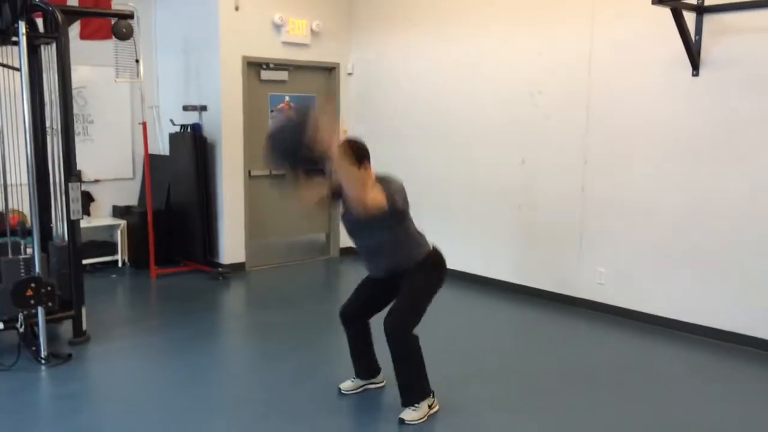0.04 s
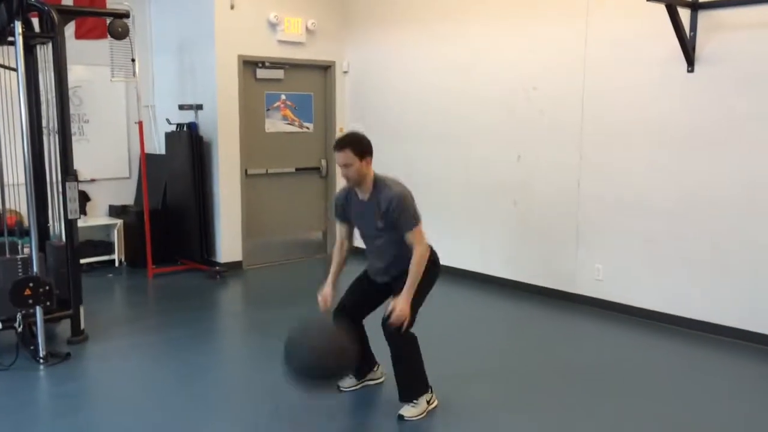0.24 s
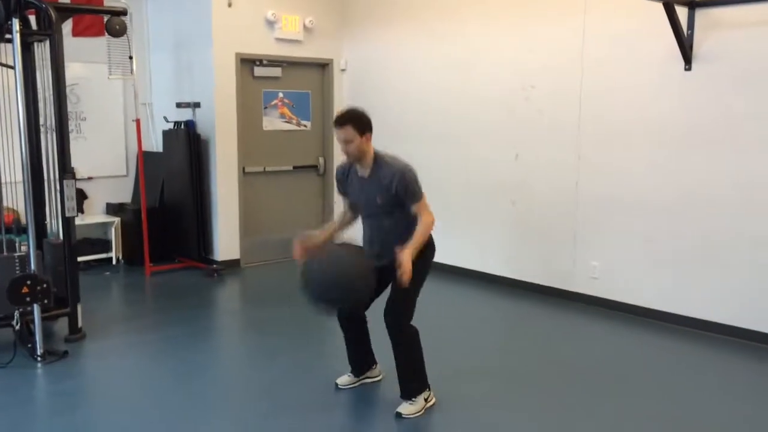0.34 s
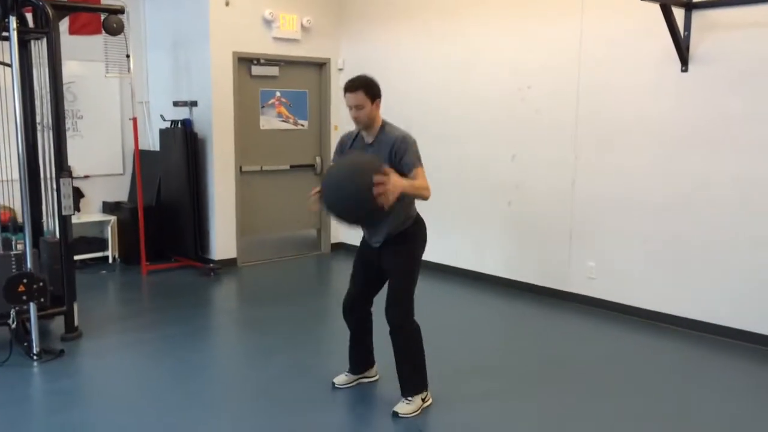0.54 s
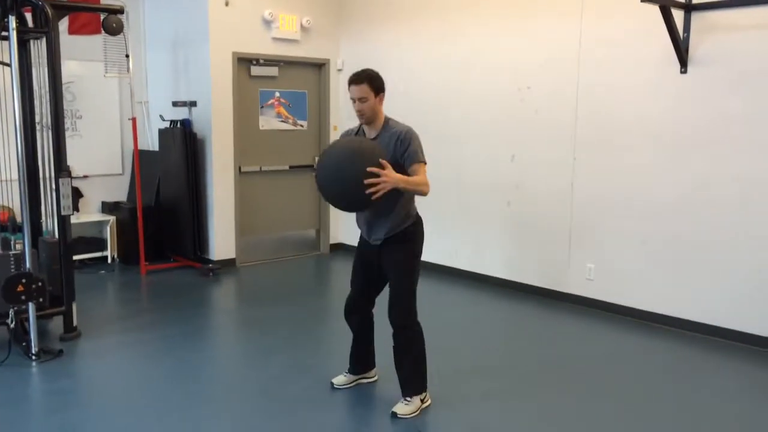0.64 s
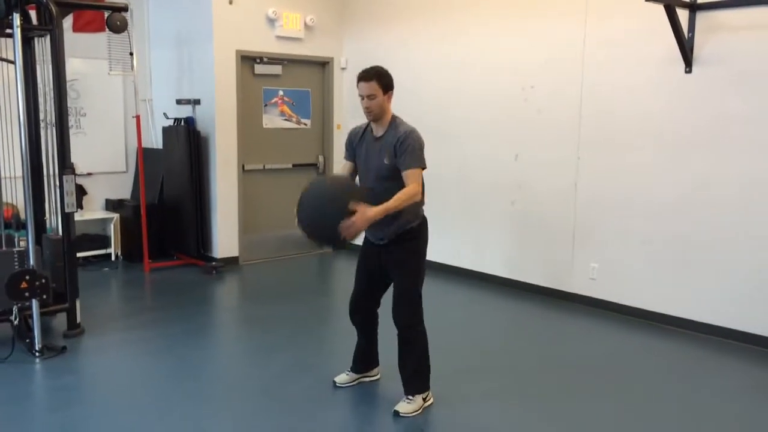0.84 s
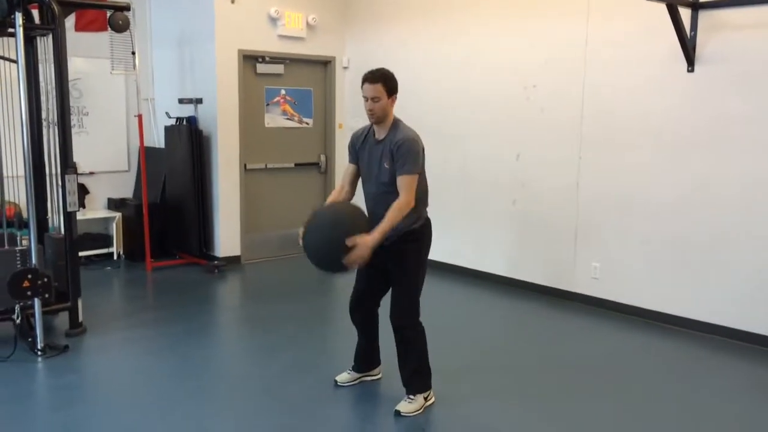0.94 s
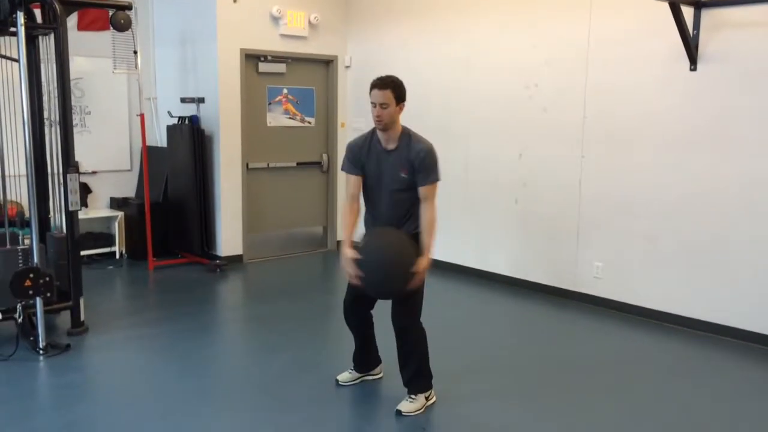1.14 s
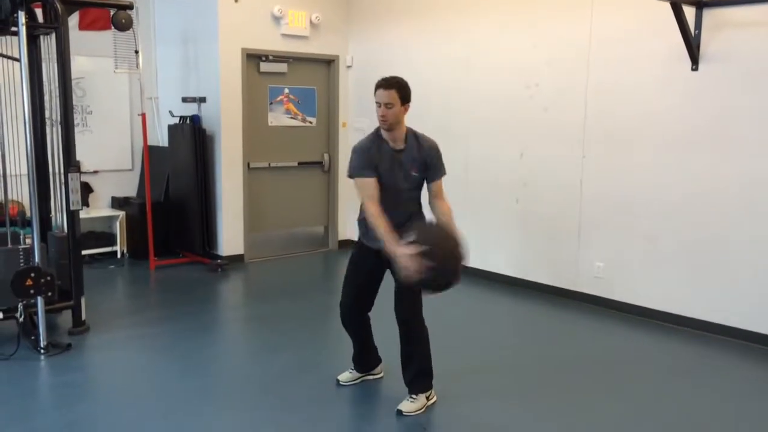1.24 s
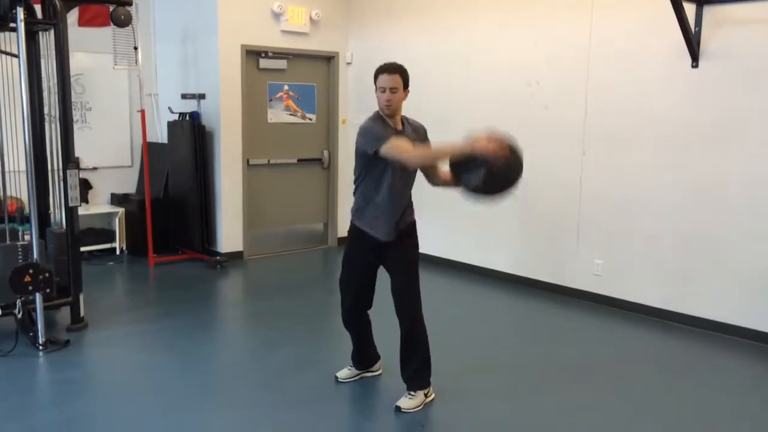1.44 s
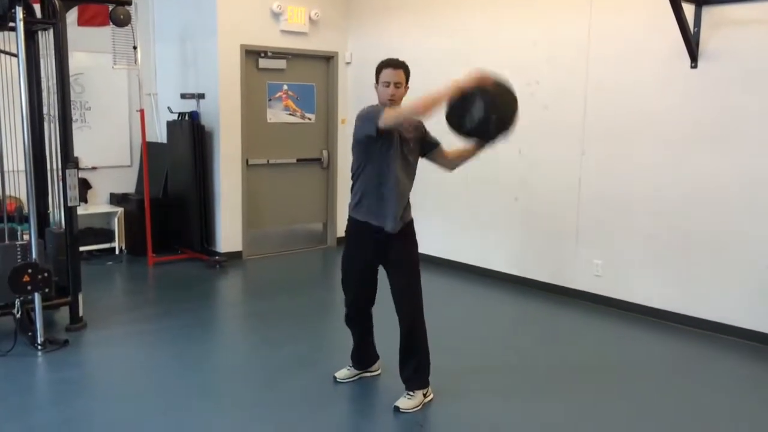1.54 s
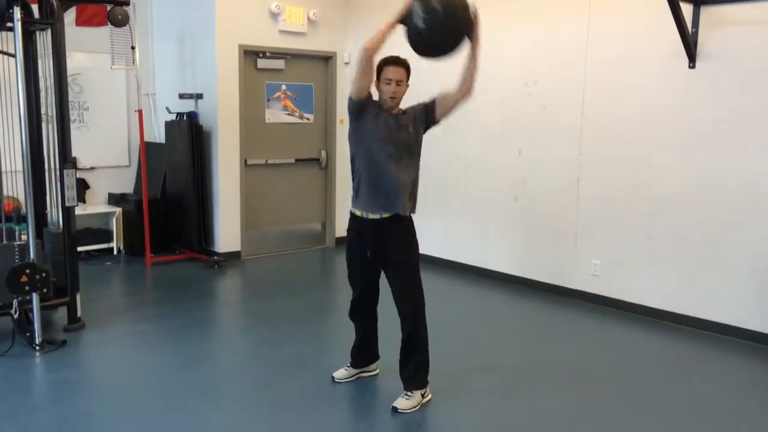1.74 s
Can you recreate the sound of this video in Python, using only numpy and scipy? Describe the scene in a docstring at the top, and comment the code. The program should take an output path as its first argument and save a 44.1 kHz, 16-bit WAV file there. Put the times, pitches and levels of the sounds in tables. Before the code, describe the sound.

A heavy ball slams onto a gym floor with one loud, echoing thud.

```python
"""Medicine ball slam in a gym

A heavy ball is slammed on a rubber floor and caught on the rebound, with a rustle of hands and clothes.
Its skin cracks, ball and floor thud, walls and ceiling reflect the crack, and the hall reverberates over
humming ventilation. A faint whistle comes and goes, and a low boom swells in the tail.
An automatic gain control ducks at the blow and recovers during the decay."""
import sys
import numpy as np
from scipy import signal
from scipy.fft import rfft, irfft
from scipy.io import wavfile
from scipy.ndimage import minimum_filter1d

SR = 44100
rng = np.random.default_rng(int(sys.argv[2]) if len(sys.argv) > 2 else 0)


def master(y):
    """Save y as 16-bit WAV."""
    cut = np.clip(np.atleast_2d(y).T, -1, 1)
    pcm = np.round(cut * 32767)  # scale
    wavfile.write(sys.argv[1], SR, pcm.astype(np.int16))


N = 79380
SLAM_S = .24155


def undb(db):
    return 10 ** (np.asarray(db) / 20)


def along(hz, table, column=1):
    """Interpolate a table column on a log-frequency scale."""
    table = np.array(table, float)
    return np.interp(np.log(np.maximum(hz, 1)), np.log(table[:, 0]), table[:, column])


def freqs():
    return np.arange(N // 2 + 1) * SR / N


def since(start):
    return np.arange(N) / SR - start


def unit_rms(x):
    return x / np.sqrt(np.mean(x ** 2))


def noise(spectrum):
    """Gaussian noise of rms 1 with the given spectral shape."""
    return unit_rms(irfft(rfft(rng.standard_normal(N)) * spectrum, N))


def decay(t, t60):
    """Exponential decay from t = 0, falling 60 dB in t60 seconds."""
    return (t >= 0) * np.exp(-np.log(1000) * np.maximum(t, 0) / t60)


def swell(time_s, width_s):
    """Gaussian envelope around a moment."""
    return np.exp(-.5 * (since(time_s) / width_s) ** 2)


def swelling_tone(peaks, hz, width_s):
    envelope = sum(undb(db) * swell(time_s, width_s) for time_s, db in peaks)
    return envelope * np.sin(2 * np.pi * hz * since(0))


def lowpass(x, hz, order=2):
    return signal.sosfilt(signal.butter(order, hz, fs=SR, output="sos"), x)


# Spectrum of rushing air (frequency [Hz], relative level [dB])
AIR_SPECTRUM = [(25, -16), (45, 1), (90, 0.5), (130, 1), (220, -9), (340, -1), (500, -11), (900, -13.5),
                (1550, -12), (2000, -14.5), (2550, -21), (3300, -18.5), (5000, -24), (7600, -26),
                (9000, -31.5), (15000, -39.5)]
# Fan tones (frequency [Hz], half-width [Hz], starting level [dB], final level [dB])
FAN_TONES = [(91, 3.5, -66.5, -58), (169.9, 4.6, -89, -58.5), (331, 8.6, -66.5, -65.5),
             (680, 30, -68, -66.5), (750.6, 13.6, -64, -66), (1026, 15, -68.5, -76),
             (1155, 27, -68.5, -65.5), (3100, 71, -77.5, -83), (4410, 140, -75, -81), (7650, 50, -96, -93)]
def ventilation(air_db=-58, rise_db=1):
    """Broadband flow noise grows slightly louder; fan tones waver, being narrow bands of noise."""
    f, progress = freqs(), np.arange(N) / N
    out = undb(air_db + rise_db * progress) * noise(undb(along(f, AIR_SPECTRUM)))
    for hz, width, first_db, last_db in FAN_TONES:
        band = noise(1 / (1 + ((f - hz) / width) ** 2))
        out += undb(first_db + (last_db - first_db) * progress) * band
    return out


# Peaks of the whistle (time [s], level [dB])
WHISTLE_PEAKS = [(.03, -60), (1.76, -59.5)]
def whistle():
    """Amplitude modulation: a faint pure tone comes and goes."""
    return swelling_tone(WHISTLE_PEAKS, hz=985, width_s=.05)


# Spectrum of the rubbing (frequency [Hz], relative level [dB])
RUSTLE_SPECTRUM = [(200, 5.5), (1800, 7), (5000, -4), (9000, -3), (14000, -5)]
# Hands on the ball and moving clothes (time [s], width [s], level [dB])
RUSTLE_STROKES = [(0.2, 0.0089, -54.5), (0.2, 0.039, -62.5), (.505, 0.011, -60), (.617, .014, -68),
                  (1.334, .045, -67)]
def thrower():
    """Friction noise: hands brush the ball, it swishes down, and clothes scuff as it swings round."""
    f = freqs()
    strokes = sum(undb(db) * swell(time_s, width_s) for time_s, width_s, db in RUSTLE_STROKES)
    rustle = strokes * noise(undb(along(f, RUSTLE_SPECTRUM)))
    swish = undb(-51) * swell(.2194, width_s=.0083) * noise(1 / (1 + (f / 2000) ** 2))
    scuff = undb(-59) * swell(1.25, width_s=.21) * noise(1 / (1 + ((f - 1350) / 800) ** 4))
    return rustle + swish + scuff


# Direct path, then reflections off nearby surfaces
# (delay [s], relative level [dB], spike time constant [s], scatter relative to spike [dB])
CRACK_PATHS = [(0, 4, 0.000021, -30.5), (.00405, -6, 0.000024, -7.5), (0.0124, -16, 0.00003, -27),
               (.0151, -1, 0.000066, -17.5), (0.0275, -3, 0.00011, -12.5), (0.0306, -13, 0.000057, -24)]
def skin_crack(gain_db=3.5, cutoff_hz=11200, scatter_hz=4200, scatter_s=.0008):
    """Multipath propagation: the skin's slap arrives along each path as a spike and a short scatter."""
    out = np.zeros(N)
    for delay, db, spike_s, scatter_db in CRACK_PATHS:
        t = since(SLAM_S + delay)
        spike = -np.exp(-np.abs(t) / spike_s)
        hiss = unit_rms(lowpass(rng.standard_normal(N), scatter_hz, order=1))
        scatter = hiss * (t > 0) * np.exp(-np.abs(t) / scatter_s)
        out += undb(db) * (spike + undb(scatter_db) * scatter)
    return undb(gain_db) * lowpass(out, cutoff_hz)


# Hollow resonances of the ball (frequency [Hz], level [dB], T60 [s])
BALL_MODES = [(73.6, -19.5, .16), (164, -23, 0.067), (244, -21.5, 0.38), (328.2, -29, 0.43),
              (778, -20.5, 0.17)]
# Standing waves and ringing fixtures of the hall (frequency [Hz], level [dB], T60 [s])
HALL_MODES = [(62, -29.5, 2.2), (70.76, -25.5, 1.16), (79.5, -32, 1.5), (136.6, -24, 1.16),
              (161.3, -21.5, 0.4), (230.3, -35.5, 1.54), (247.4, -29, 1.02), (266, -37, 0.56),
              (314.6, -25.5, 0.62), (434.6, -46, 2.16), (721, -18.5, 0.38), (763, -28, 0.66),
              (1267, -41, 1.05), (1535, -41, 1.5)]
def thud(hall_rise_s=.032):
    """Damped normal modes: the impact excites the ball at once, while the hall's modes build up."""
    t = since(SLAM_S)

    def ring(modes):
        return -sum(undb(db) * np.sin(2 * np.pi * hz * t) * decay(t, t60) for hz, db, t60 in modes)

    build_up = 1 - np.exp(-np.maximum(t, 0) / hall_rise_s)
    return ring(BALL_MODES) + ring(HALL_MODES) * build_up


# Diffuse field (frequency [Hz], early level [dB in 1 kHz], late level [dB in 1 kHz], late T60 [s])
DIFFUSE_FIELD = [(25, -30, -29.5, 2.2), (69, -29, -12, 2.05), (102, -14, -24, 1.88), (157, -5.5, -17, 1.43),
                 (262, -6.5, -19.5, 1.37), (390, -17.5, -23.5, 1.34), (600, -23, -25.5, 1.44),
                 (790, -16.5, -21.5, 1.34), (1320, -17, -23.5, 1.33), (2460, -19, -27.5, 1.194),
                 (4650, -26, -31.5, 0.83), (7560, -31.5, -37, 0.56), (15000, -40.5, -57, 0.42)]
def reverberation(early_t60=.27, build_s=.029, onset_gain=.21):
    """Double-slope decay: reflections thicken, die quickly, then linger; the treble fades first."""
    t, f, out = since(SLAM_S), freqs(), np.zeros(N)
    edges_hz = np.geomspace(22, 17000, 41)
    for lo, hi in zip(edges_hz, edges_hz[1:]):
        centre_hz = np.sqrt(lo * hi)
        early_db, late_db, late_t60 = (along(centre_hz, DIFFUSE_FIELD, column) for column in (1, 2, 3))
        early = undb(early_db) * decay(t, early_t60)
        late = undb(late_db) * decay(t, late_t60)
        band = np.sqrt((hi - lo) / 1000) * noise((f >= lo) & (f < hi))
        out += band * np.hypot(early, late)  # incoherent sounds add in power
    build_up = np.minimum(onset_gain + (1 - onset_gain) * (t / build_s) ** 2, 1)
    return out * build_up


# Peaks of the boom (time [s], level [dB])
BOOM_PEAKS = [(0.712, -33.5), (1.11, -46), (1.249, -48.5), (1.345, -47)]
def boom():
    """Amplitude modulation: a low tone swells now and then in the tail."""
    return swelling_tone(BOOM_PEAKS, hz=66, width_s=.03)


def scene():
    """Superposition: the pressures of all sources add in one channel."""
    slam = skin_crack() + thud() + reverberation()
    return (slam + thrower() + ventilation() + whistle() + boom())[None]


def record(dry, threshold_db=-12, max_duck_db=5.5, hold_s=.21, release_db_per_s=71):
    """Automatic gain control: a peak ducks the gain, which holds, then recovers; the band is limited."""
    low_cut = signal.butter(2, 51, "high", fs=SR, output="sos")
    high_cut = signal.ellip(8, .2, 80, 15250, fs=SR, output="sos")
    dry = signal.sosfilt(low_cut, dry)
    level_db = 20 * np.log10(np.abs(dry[0]) + 1e-9)
    excess_db = np.clip(level_db - threshold_db, 0, max_duck_db)
    half_hold = int(hold_s * SR / 2)
    # greatest excess over the preceding hold time
    held_db = -minimum_filter1d(-excess_db, 2 * half_hold + 1, origin=half_hold, mode="constant")
    ramp_db = release_db_per_s * since(0)
    duck_db = np.maximum.accumulate(held_db + ramp_db) - ramp_db  # instant attack, steady release
    return signal.sosfilt(high_cut, dry * undb(-duck_db))


dry = scene()
out = record(dry)
master(out)
```